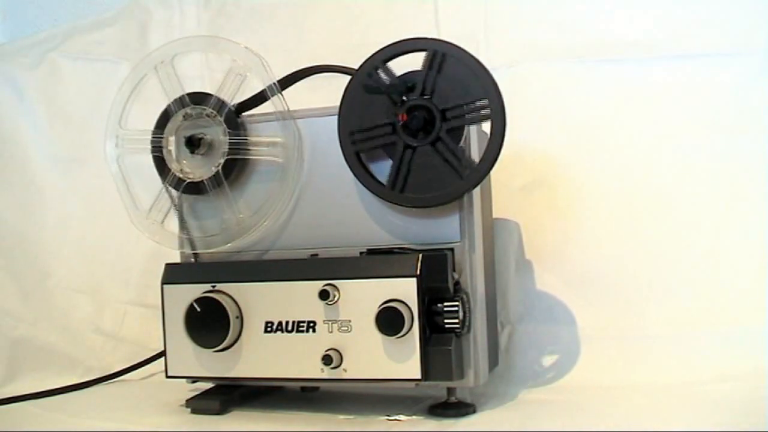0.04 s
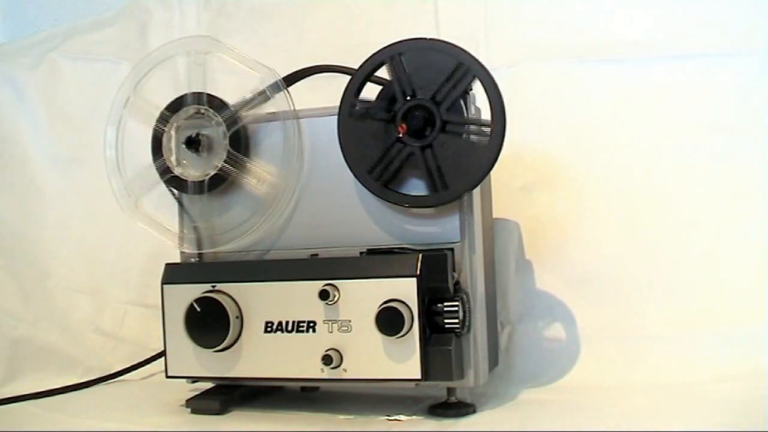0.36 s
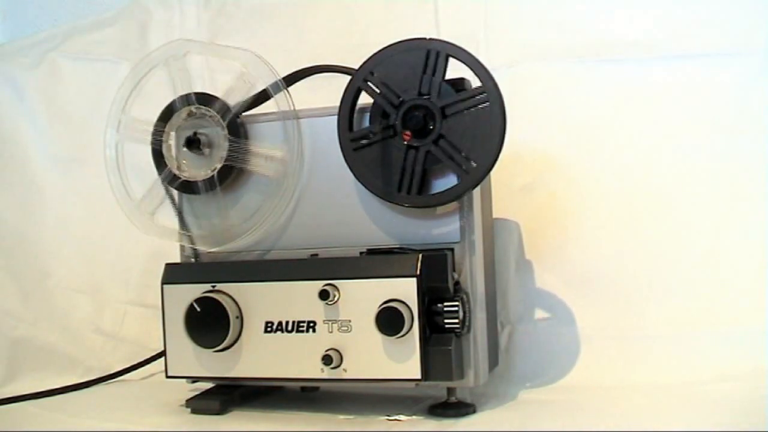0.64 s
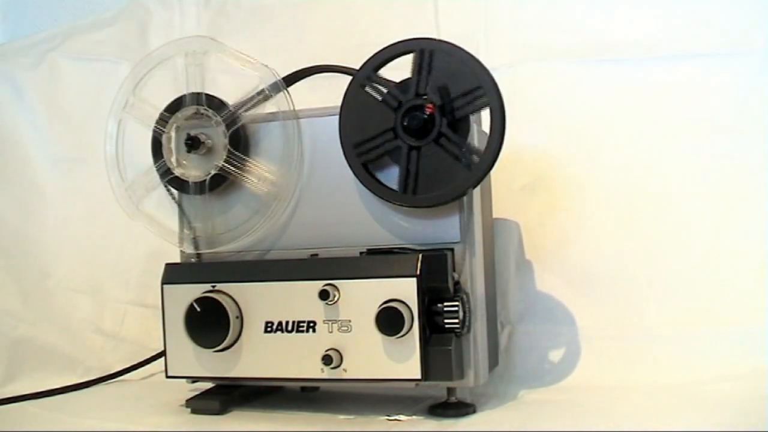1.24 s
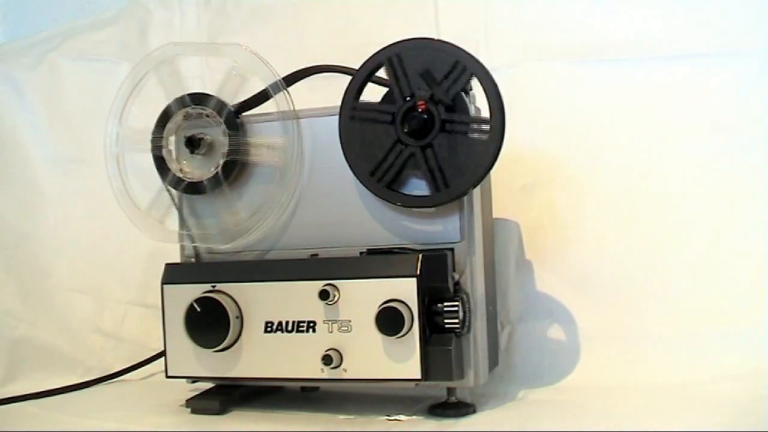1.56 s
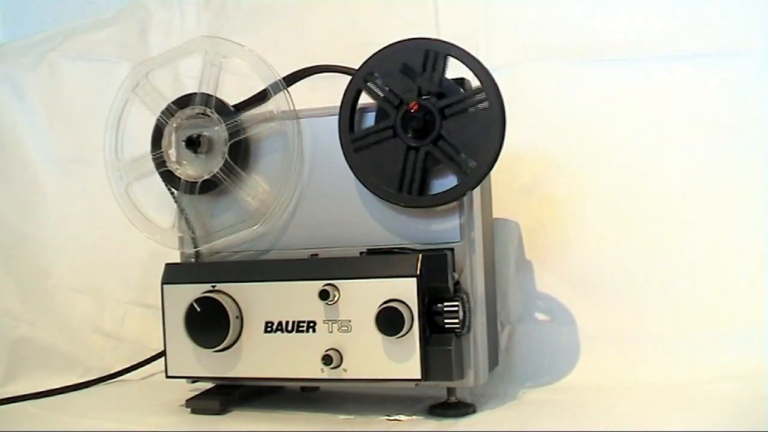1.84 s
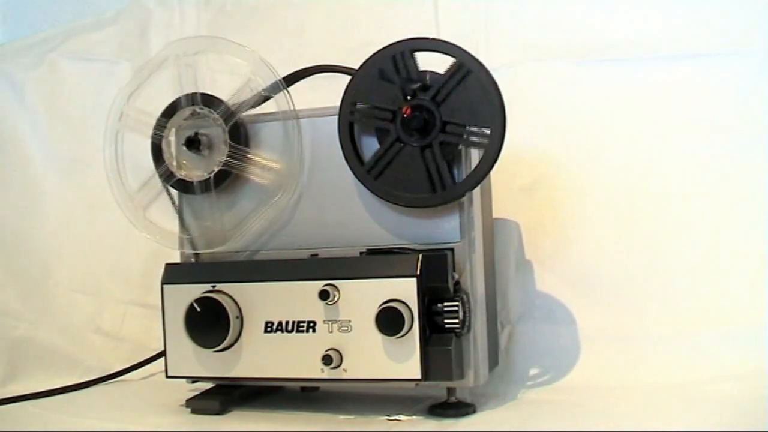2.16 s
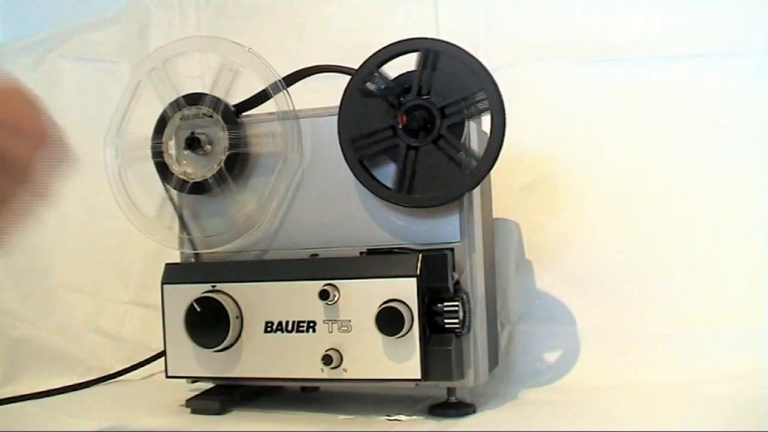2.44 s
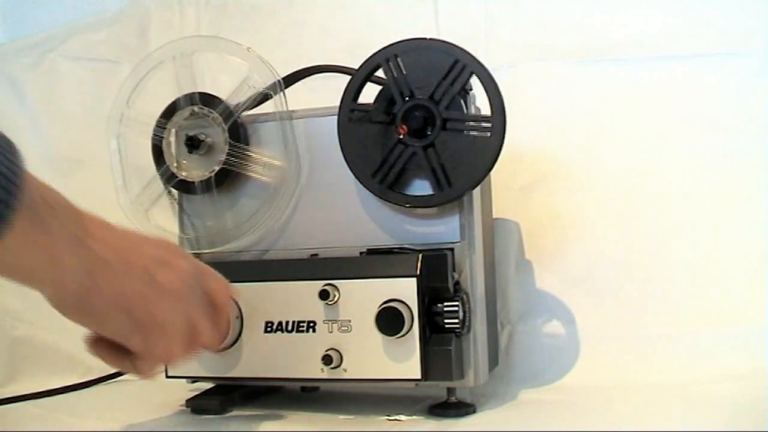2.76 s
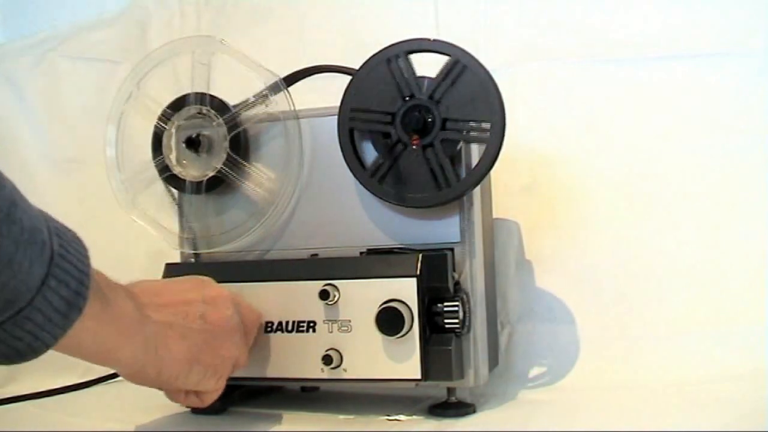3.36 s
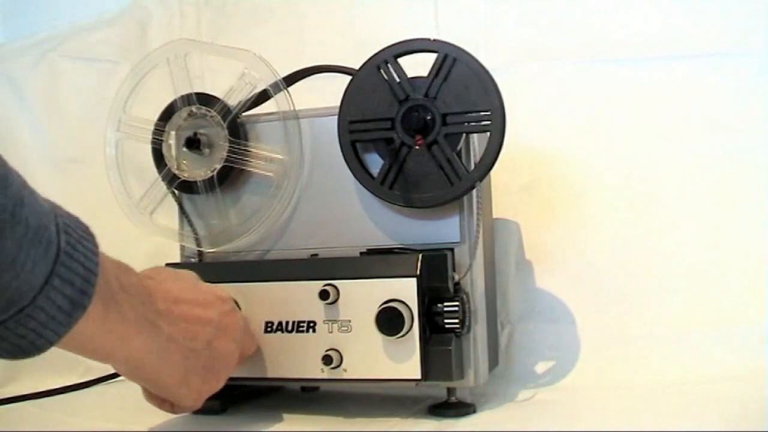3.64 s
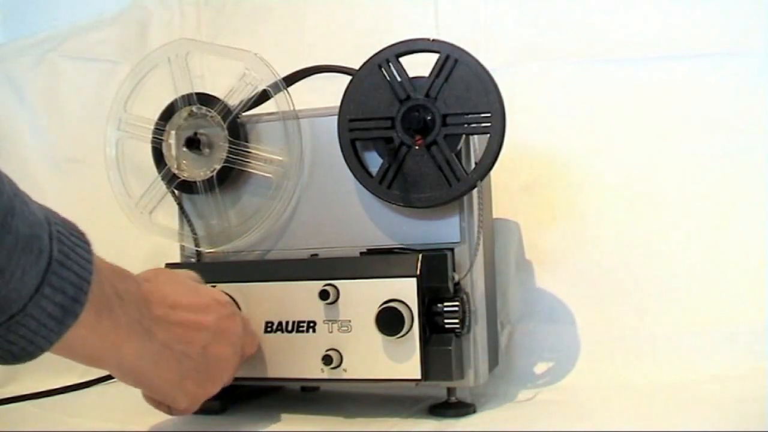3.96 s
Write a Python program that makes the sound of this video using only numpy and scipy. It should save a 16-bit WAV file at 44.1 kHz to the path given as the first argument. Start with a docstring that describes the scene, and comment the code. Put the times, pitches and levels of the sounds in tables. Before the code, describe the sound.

Close by indoors, a small film projector ticks and clatters rapidly while its motor whirrs and the film slaps and rustles. Then a knob rattles and clicks over sharply, and the machine quickly falls silent.

```python
"""A small film projector clatters in a room, about 15 frames a second, over its motor's hum and whirr.
At each frame the claw ticks in, knocks the chassis and drags the film, which slaps its gate and now
and then snaps taut, hardest between two and three seconds in. A hand bumps the housing and turns
the main knob: it rattles, clicks and clunks, and the motor stops."""
import sys
import numpy as np
from scipy import signal
from scipy.fft import rfft, irfft, next_fast_len
from scipy.io import wavfile
from scipy.ndimage import uniform_filter1d

SR = 44100
rng = np.random.default_rng(int(sys.argv[2]) if len(sys.argv) > 2 else 0)


def digitize_waveform(pressure):
    """Quantize a signal to 16-bit integers and store it at the path in sys.argv[1].

    Rows of a 2-D input are taken as channels; values are limited to [-1, 1].
    """
    field = np.atleast_2d(pressure).T
    bounded = np.clip(field, -1, 1)
    quanta = np.round(bounded * 32767).astype(np.int16)
    wavfile.write(sys.argv[1], SR, quanta)


N = 176400
BLOW_GAIN = np.sqrt(0.00057 * SR)  # packs the energy of a 0.57 ms blow into one sample


def amp(db):
    return 10 ** (np.asarray(db) / 20)


def unit(x):
    return x / np.sqrt(np.mean(x ** 2) + 1e-20)


def along(points, hz):
    """A curve through (Hz, value) points on a log frequency axis, read at hz."""
    f, values = np.transpose(points)
    return np.interp(np.log(hz + 1), np.log(f + 1), values)


def filtered(x, response):
    """x through a complex frequency response."""
    size = next_fast_len(N + SR // 2)
    return irfft(rfft(x, size) * response(np.fft.rfftfreq(size, 1 / SR)), size)[..., :N]


def coloured(x, spectrum):
    """x through a smooth EQ curve of unit power."""
    return filtered(x, lambda f: unit(amp(along(spectrum, f))))


def rung(x, modes):
    """x ringing a body's resonances, their joint response scaled to unit power."""
    def response(f):
        body = sum((-1) ** k * amp(db) * 1j * f * width / (hz * hz - f * f + 1j * f * width)
                   for k, (hz, width, db) in enumerate(modes))
        return body / np.sqrt(np.mean(abs(body) ** 2))
    return filtered(x, response)


def softened(x, corner_hz):
    """x without the treble that a blunt contact cannot excite."""
    return signal.sosfilt(signal.butter(4, corner_hz, fs=SR, output="sos"), x)


def varied(x, depth_db):
    """x with a colour that drifts at random, so no two contacts sound the same."""
    spectra = signal.stft(x, nperseg=128)[2]
    drift = uniform_filter1d(rng.standard_normal(spectra.shape), size=3, axis=0)
    drift = uniform_filter1d(drift, size=24, axis=1)
    return signal.istft(spectra * unit(amp(depth_db * unit(drift))), nperseg=128)[1][:N]


def contacts(rows, rise_s=0.00007):
    """Rough contact forces: a noise burst for each (start in seconds, level in dB, decay in seconds)."""
    track, t = np.zeros(N + SR), np.arange(SR // 12) / SR
    for start, db, decay in rows:
        shape = np.exp(-t / decay) * (1 - np.exp(-t / rise_s))
        force = shape * unit(rng.uniform(-0.85, 1, len(t)))
        track[max(round(start * SR), 0):][:len(t)] += amp(db) * force / shape.max()
    return track[:N]


def pair(x):
    """Two unrelated signals blended into a partly alike left and right, at unit power."""
    # Stereo likeness. Each row: frequency in Hz, left-right correlation (clipped to +-1 below).
    likeness = [(50, 1.5), (130, -0.5), (500, 0.76), (2000, 0.78), (5000, 0.63), (12000, -0.4)]
    angle = lambda f: np.arccos(np.clip(along(likeness, f), -1, 1)) / 2
    mid, side = filtered(x, lambda f: np.array([np.cos(angle(f)), np.sin(angle(f))]))
    return unit(np.array([mid + side, mid - side]))


def room_tone():
    """The bed: a soft, dark noise with faint steady bands of hiss."""
    # The quiet room's colour. Each row: frequency in Hz, relative level in dB.
    air_eq = [(25, -17), (50, -2), (100, -3.5), (160, -6.5), (300, 0.5), (620, -5), (1000, -9),
              (1600, -15.5), (4700, -13), (6100, -11.5), (7000, -22.5), (11000, -22), (16000, -33)]
    # Hiss bands. Each row: centre in Hz, width in Hz, relative level in dB.
    hiss_bands = [(3700, 150, 0), (5600, 220, -6), (6080, 260, -1)]
    air = pair(coloured(rng.standard_normal((2, N)), air_eq))
    hiss = pair(rung(rng.standard_normal((2, N)), hiss_bands))
    return amp(-63.5) * air + amp(-73.5) * hiss


def frame_times():
    """The moments, in seconds, at which the claw enters the film."""
    # The claw's pace, with one longer gap between ticks near one second.
    # Each row: time in seconds, frame number.
    pace = [(.0496, 0), (.9814, 14), (1.0758, 15), (1.4797, 21), (1.9489, 28), (2.0854, 30), (2.3578, 34),
            (2.5586, 37), (2.8969, 42), (3.1693, 46), (3.5041, 51)]
    times, numbers = np.transpose(pace)
    return np.interp(np.arange(numbers[-1] + 1), numbers, times)


def motor(stop_s=3.591, fade_db_per_s=112):
    """Drive hum and gear whirr die away after the switch; a faint mains hum stays on."""
    # The drive's hum. Each row: multiple of the frame rate, level in dB.
    orders = [(3, -68.5), (6, -65.5), (9, -64.5)]
    # Mains hum. Each row: pitch in Hz, dB of the part that dies with the motor, dB of the steady part.
    mains_tones = [(100, -73.5, -79), (201.6, -89.5, -76.5)]
    # The gears' colour. Each row: frequency in Hz, relative level in dB.
    whirr_eq = [(25, -30), (72, -7.5), (105, 1), (170, -6.5), (260, -8.5), (400, -3.5), (560, -0.5),
                (660, -3.5), (1300, -4.5), (1800, -8.5), (2400, -8), (3300, -15.5), (5000, -16),
                (9000, -29.5), (11300, -29), (16000, -63)]
    # The casing, rung by the gears. Each row: pitch in Hz, width in Hz, relative level in dB.
    casing_modes = [(370.4, 9.6, 0), (429, 44, -8), (479.6, 59, 1), (580.5, 11.2, 5.5), (772, 46, 1),
                    (973, 47, -1.5), (1113, 41, -2), (1187, 12, -14), (1453, 25, -1.5), (1770, 105, -6)]
    t = np.arange(N) / SR
    running = amp(-fade_db_per_s * np.maximum(t - stop_s, 0))
    starts = frame_times()
    frame_rate = np.interp(t, starts[1:], signal.medfilt(1 / np.diff(starts)))
    phase = 2 * np.pi * np.cumsum(frame_rate) / SR
    hum = sum(np.sqrt(2) * amp(db) * np.sin(k * phase + rng.uniform(0, 2 * np.pi)) for k, db in orders)
    mains = sum(np.sqrt(2) * (amp(motor_db) * running + amp(steady_db)) * np.sin(2 * np.pi * hz * t)
                for hz, motor_db, steady_db in mains_tones)
    flutter = amp(0.4 * unit(uniform_filter1d(rng.standard_normal(N), size=130)))
    gears = lambda: flutter * rng.standard_normal((2, N))
    whirr = amp(-52.5) * pair(coloured(gears(), whirr_eq))
    casing = amp(-55) * pair(rung(gears(), casing_modes))
    return running * (hum + whirr + casing) + mains


def bump(start_s=3.02):
    """The hand meets the housing as it takes the knob: a soft low thud that swells and dies."""
    # The housing's modes. Each row: pitch in Hz, peak level in dB, swell in seconds.
    housing_modes = [(88, -55, .026), (165, -59, .01)]
    t = np.maximum(np.arange(N) / SR - start_s, 0)
    return sum(amp(db) * t / swell * np.exp(1 - t / swell) * np.sin(2 * np.pi * hz * t)
               for hz, db, swell in housing_modes)


def knob(switch_s=3.5637, switch_db=-13.5):
    """The knob's cam rattles, its spring snaps over in one clean blow and the lever clunks the panel."""
    # The knob's contacts. Each row: start in seconds, click in dB, clunk in dB, decay in seconds.
    hits = [(3.513, -39, -45, 0.0043), (3.5193, -47, -37, 0.0041), (3.5295, -50, -31, 0.0031),
            (3.5325, -44, -39, 0.0034), (3.5632, -27.5, -28.5, 0.001), (3.5682, -36, -35.5, 0.0021),
            (3.5760, -38, -28, .0016), (3.5792, -34, -29.5, 0.00075), (3.5818, -47, -30.5, 0.0027),
            (3.5880, -39, -30.5, 0.0022), (3.5990, -48, -41, 0.0097), (3.7230, -55, -56.5, 0.0011)]
    # The switch spring's bright ring. Each row: pitch in Hz, width in Hz, relative level in dB.
    spring_modes = [(1950, 500, -17), (3900, 280, -6), (4800, 560, 1.5), (5350, 540, 2), (6700, 500, -9),
                    (8000, 800, -18), (11300, 1000, -23)]
    # The front panel's hollow ring. Each row: pitch in Hz, width in Hz, relative level in dB.
    panel_modes = [(470, 115, -10), (606, 35, -3.5), (771, 32, 4), (948, 38, 1), (1116, 61, 2.5),
                   (1340, 130, -0.5), (1606, 104, -2.5), (1790, 120, -7.5), (2280, 580, -9)]
    clicks = contacts([(start, db, decay) for start, db, _, decay in hits], rise_s=0.0005)
    clicks[round(switch_s * SR)] += amp(switch_db) * BLOW_GAIN
    clunks = contacts([(start, db, decay) for start, _, db, decay in hits])
    spring = softened(rung(clicks, spring_modes), corner_hz=12800)
    panel = softened(rung(clunks, panel_modes), corner_hz=3600)
    return spring + panel


def film_rustle(rubs_per_s=45, level_db=-58, decay_s=0.0035):
    """Loose loops of film rub softly at uneven moments for as long as the claw runs."""
    slots = np.arange(0, frame_times()[-1], 1 / rubs_per_s)
    rubs = [(slot + rng.normal() / rubs_per_s, rng.normal(level_db, 1.5), decay_s) for slot in slots]
    # The rustle's papery colour. Each row: frequency in Hz, relative level in dB.
    rustle_eq = [(1000, -14), (3300, -12), (4500, -1), (5150, 0), (5900, -9), (8000, -19), (15000, -48)]
    return coloured(contacts(rubs, rise_s=0.0073), rustle_eq)


def film_snaps(slap_db=-47.5, slap_decay_s=0.0032, snap_decay_s=0.0021, crack_decay_s=0.0013):
    """The film slaps its gate twice a frame and sometimes snaps taut: the harder, the brighter."""
    # The two soft slaps. Each row: earliest and latest delay after the claw's tick, in seconds.
    slap_windows = [(.005, .010), (.009, .015)]
    # The hard snaps. Each row: start in seconds, level in dB.
    snap_hits = [(0.0557, -33), (0.2598, -33.5), (1.16, -39), (1.2910, -38), (1.348, -37), (1.56, -37),
                 (1.9620, -36), (2.03, -32.5), (2.0947, -23.5), (2.1652, -29.5), (2.2314, -30.5),
                 (2.299, -32), (2.3665, -32.5), (2.435, -32), (2.504, -27.5), (2.613, -34.5),
                 (2.703, -31.5), (2.7666, -26), (2.7760, -39.5), (2.838, -36), (2.9037, -37.5),
                 (3.0464, -44.5), (3.1880, -37), (3.243, -36), (3.4464, -38.5)]
    # The ring of film and gate. Each row: pitch in Hz, width in Hz, relative level in dB.
    gate_modes = [(1236, 126, -5), (1510, 61, 0), (2600, 640, -8), (3740, 260, 0), (4450, 420, -1.5),
                  (5200, 650, -0.5), (6200, 700, -3.5), (7720, 600, -7.5)]
    # A snap's dry crack. Each row: frequency in Hz, relative level in dB.
    crack_eq = [(800, -6), (1500, -2), (2500, -7), (5500, 1), (8000, 2), (9200, -3), (10500, -1.5),
                (12500, -9), (16000, -23)]
    slaps = [(start + rng.uniform(*window), rng.normal(slap_db, 4.5), slap_decay_s)
             for start in frame_times() for window in slap_windows]
    snaps = [(start, db, snap_decay_s) for start, db in snap_hits]
    hardest_db = max(db for _, db in snap_hits)
    # The crack sits 2.5 dB under the hardest snap and falls further behind on softer ones.
    cracks = [(start, db - 2.5 - 0.45 * (hardest_db - db), crack_decay_s) for start, db in snap_hits]
    force = contacts(slaps + snaps, rise_s=0.0005)
    crack = coloured(contacts(cracks, rise_s=0.0005), crack_eq)
    gate = varied(rung(force, gate_modes), depth_db=1.3)
    return softened(gate, corner_hz=12000) + crack


def claw(tick_db=-46, tick_decay_s=0.0014, drag_db=-45.5, drag_s=0.015, knock_corner_hz=3620):
    """At each frame the claw ticks in, knocks the chassis and gives the film a short gritty drag."""
    # The knocks within one frame. Each row: delay in seconds, level in dB.
    knocks = [(.0015, -32.5), (.007, -38), (.023, -41.5), (.030, -45)]
    # The chassis' ring. Each row: pitch in Hz, width in Hz, relative level in dB.
    chassis_modes = [(492, 37, -6), (1030, 110, -1.5), (1145, 34, 7.5), (1410, 70, -3.5), (1543, 49, -1.5),
                     (1810, 70, -3), (2400, 110, -3), (2990, 430, -19)]
    # The colours of the tick and of the drag. Each row: frequency in Hz, relative level in dB.
    tick_eq = [(500, -4), (1500, 2), (4000, 9.5), (7000, -10), (9000, -2.5), (11500, 0.5), (13000, -9),
               (16000, -18)]
    drag_eq = [(400, -5), (1200, 3), (2300, 1), (3100, -3.5), (4000, 2), (5300, 1), (7000, -6.5),
               (9000, -16), (11500, -15), (15000, -42)]
    starts = frame_times()
    scatter_db = lambda: rng.normal(0, 1)
    ticks = contacts([(start, tick_db + scatter_db(), tick_decay_s) for start in starts])
    blows, pulls = np.zeros(N), np.zeros(N)
    progress = np.linspace(0, 1, round(drag_s * SR))
    arch = np.sqrt(4 * progress * (1 - progress))
    for start in starts:
        for delay, db in knocks:
            knock_s = start + delay + rng.normal(0, 0.0003)
            blows[round(knock_s * SR)] += amp(db + scatter_db()) * BLOW_GAIN
        pulls[round(start * SR):][:len(arch)] = amp(drag_db + scatter_db()) * arch
    grit = unit(rng.standard_normal(N) * rng.exponential(size=N))
    blows = filtered(blows, lambda f: 1 / (1 + 1j * f / knock_corner_hz))
    return coloured(ticks, tick_eq) + rung(blows, chassis_modes) + coloured(pulls * grit, drag_eq)


def room(x, tail_db=-13, walls_db=-9, walls_decay_s=0.018):
    """The direct sound, widened, with dense first reflections off the walls and a short tail."""
    # The room's decay. Each row: frequency in Hz, seconds to fall by 60 dB.
    decay_times = [(150, 1), (1000, 0.23), (5000, 0.26), (12000, 0.23)]
    # The direct sound's width. Each row: frequency in Hz, side level in dB.
    spread = [(100, -1), (4000, -26), (6500, -13), (9000, -4), (13000, -0.5)]
    hz, t, spectra = signal.stft(rng.standard_normal((2, SR // 2)), SR, nperseg=256)
    fade = amp(-60 * t / along(decay_times, hz)[:, None])
    tail = signal.istft(spectra * fade, SR, nperseg=256)[1]
    age = np.arange(tail.shape[1]) / SR
    walls = rng.standard_normal(tail.shape) * np.exp(-age / walls_decay_s) * (age > 0.002)
    impulse = amp(tail_db) * tail / np.linalg.norm(tail[0])
    impulse += amp(walls_db) * walls / np.linalg.norm(walls[0])
    wet = signal.fftconvolve(x[None], impulse, axes=1)[:, :N]
    side = filtered(x, lambda f: 1j * amp(along(spread, f)))
    return np.array([x + side, x - side]) + pair(wet) * wet.std()


def scene():
    """The projector in its room, a little to the right, over the room tone."""
    # The projector's pan. Each row: frequency in Hz, left minus right in dB.
    balance = [(30, -9), (60, -7), (110, -11.5), (200, -5.5), (380, -7.5), (700, -1.5), (2400, -1.3),
               (7000, -2.5), (12000, -0.5)]
    bed = room_tone()
    projector = room(claw() + film_snaps() + film_rustle() + knob()) + bump() + motor()
    pan = lambda f: amp(np.array([[0.5], [-0.5]]) * along(balance, f))
    return filtered(projector, lambda f: pan(f) / pan(f).mean(axis=0)) + bed


def record(dry):
    """Rolls off the deepest bass and cuts the very top of the treble."""
    low_cut_hz, top_hz = 49, 16100
    return filtered(dry, lambda hz: (hz < top_hz) * hz ** 4 / np.sqrt(hz ** 8 + low_cut_hz ** 8))


dry = scene()
out = record(dry)
digitize_waveform(out)
```